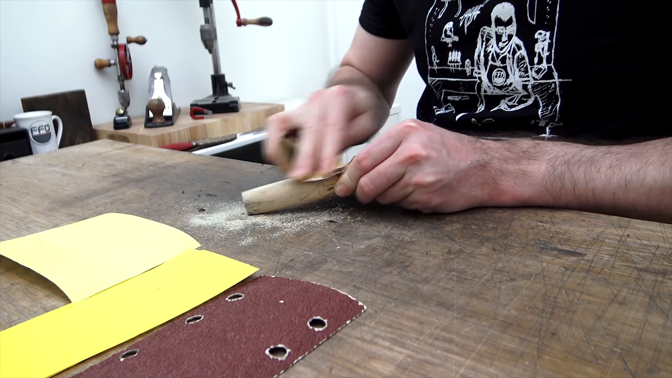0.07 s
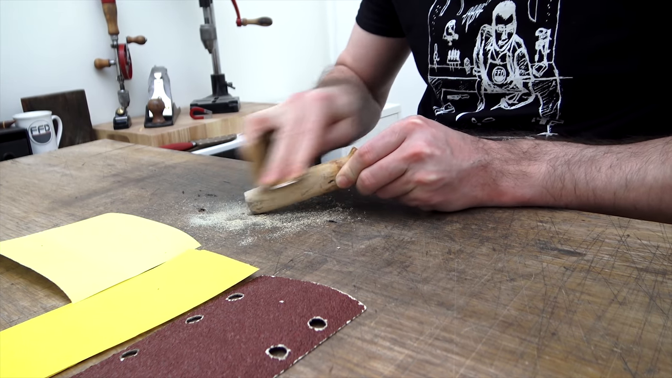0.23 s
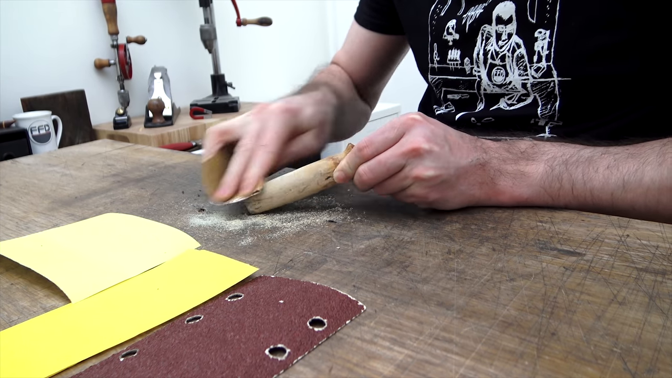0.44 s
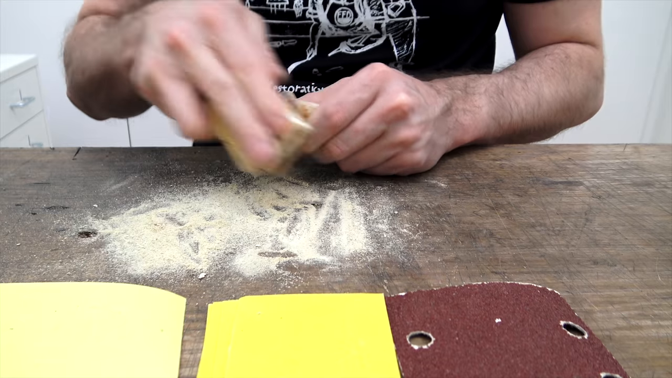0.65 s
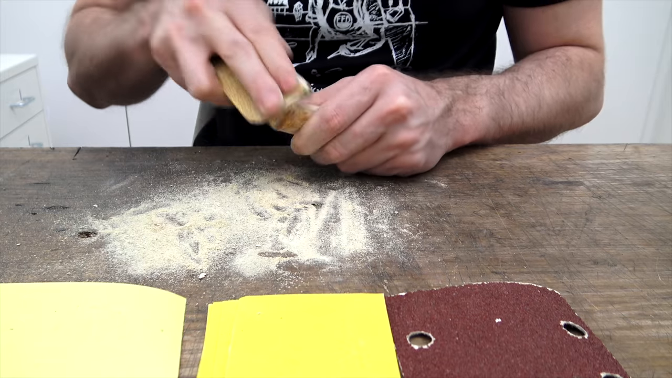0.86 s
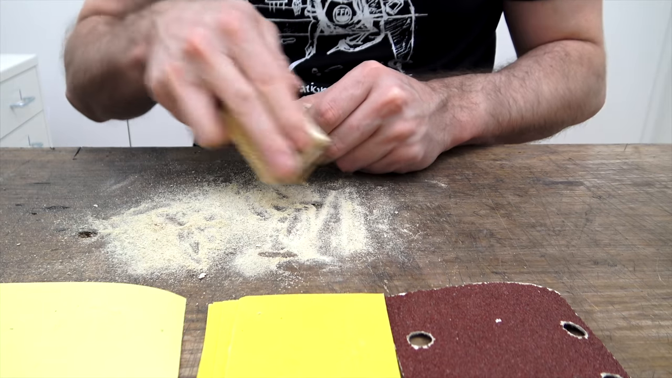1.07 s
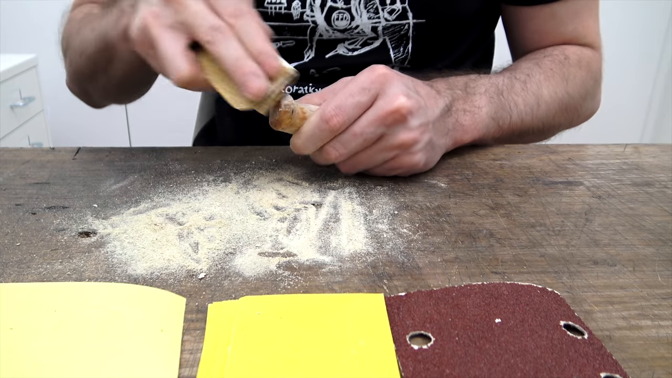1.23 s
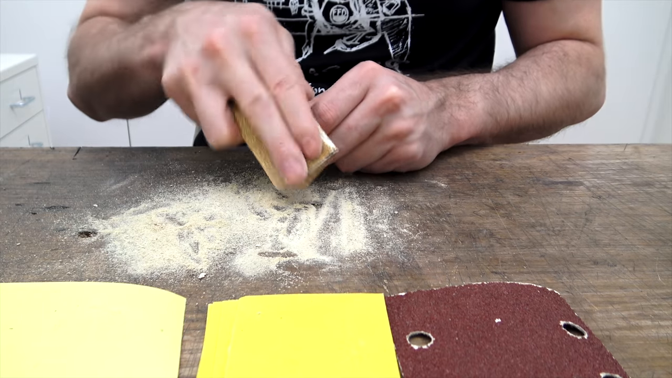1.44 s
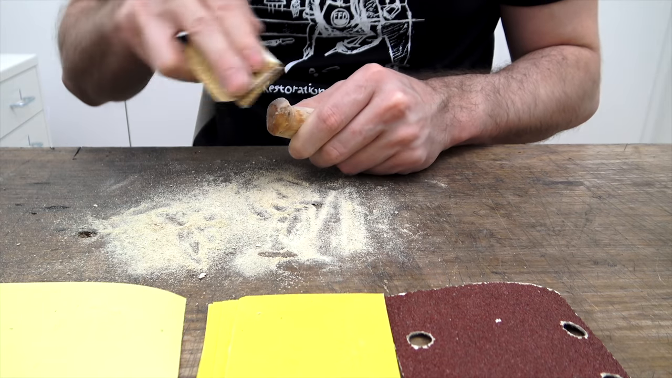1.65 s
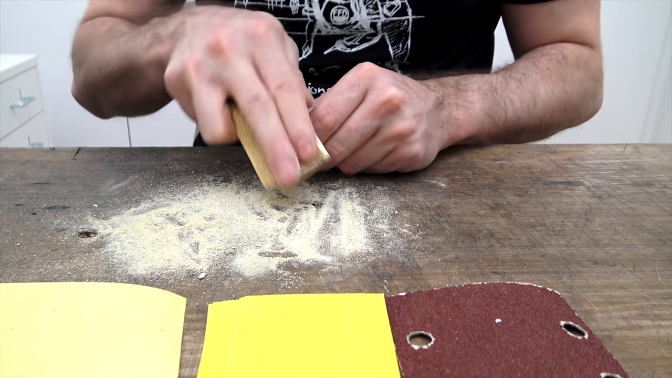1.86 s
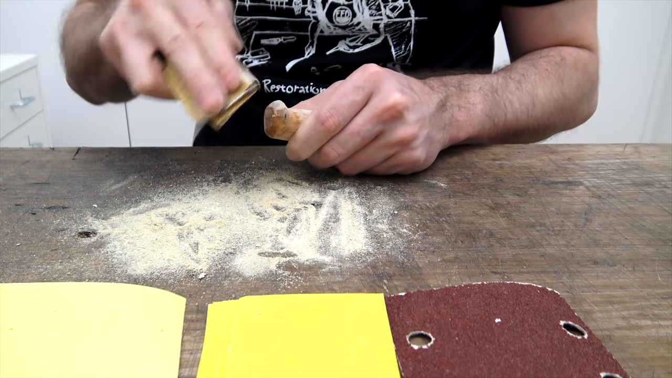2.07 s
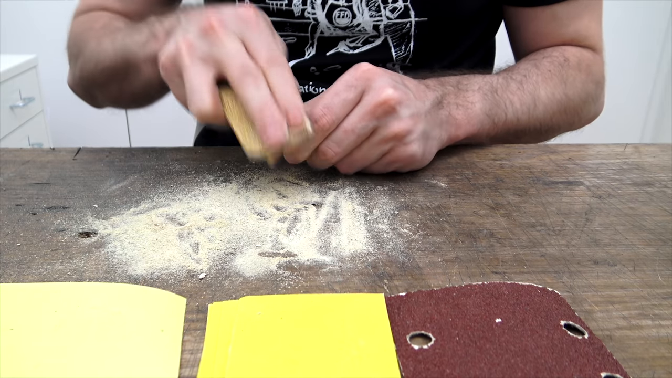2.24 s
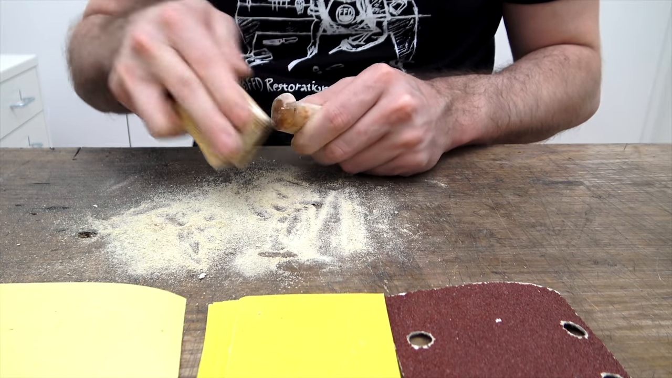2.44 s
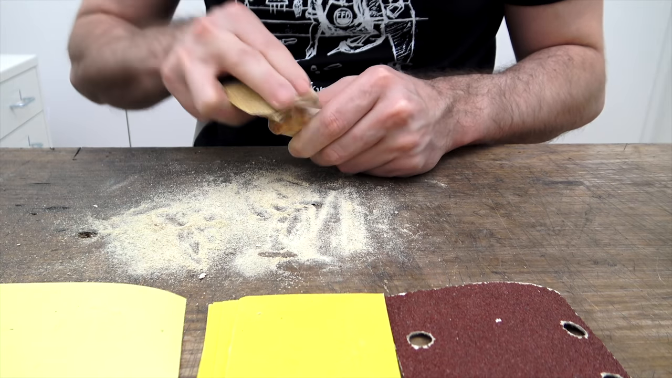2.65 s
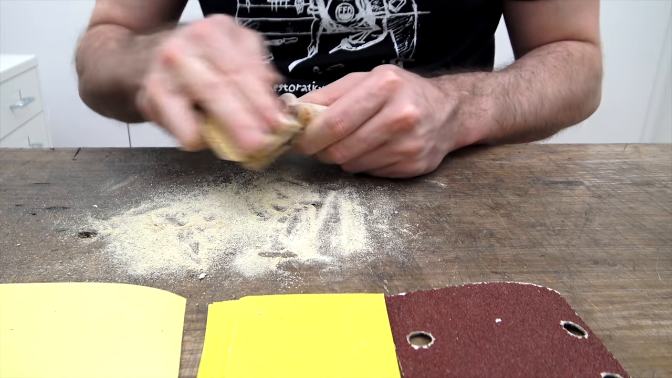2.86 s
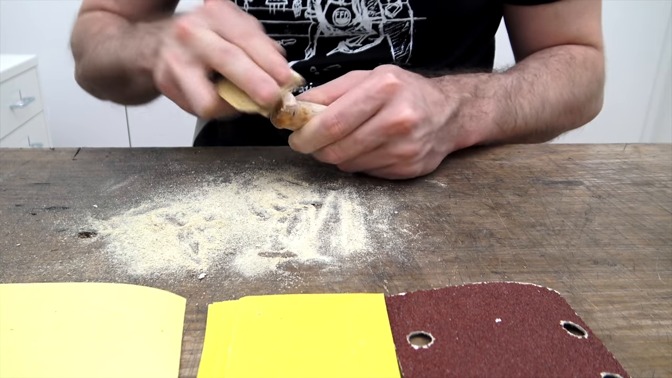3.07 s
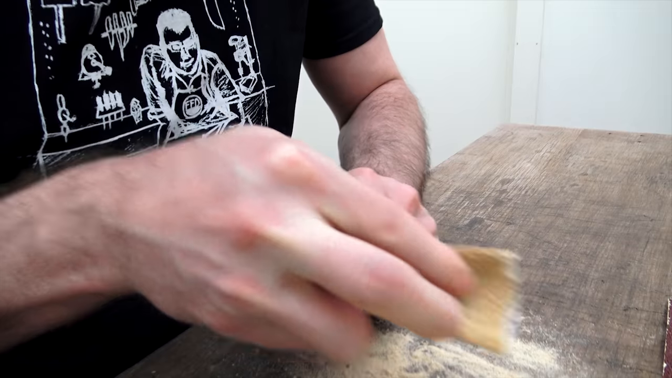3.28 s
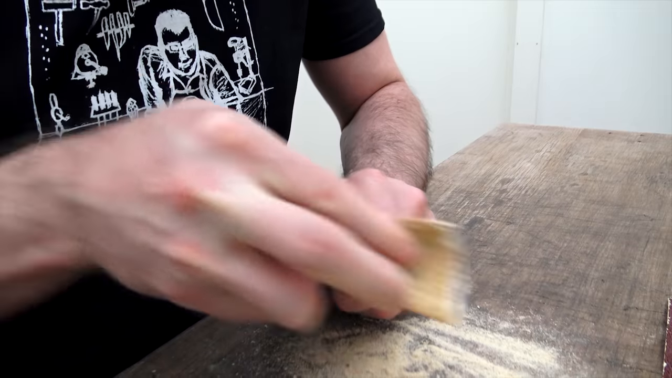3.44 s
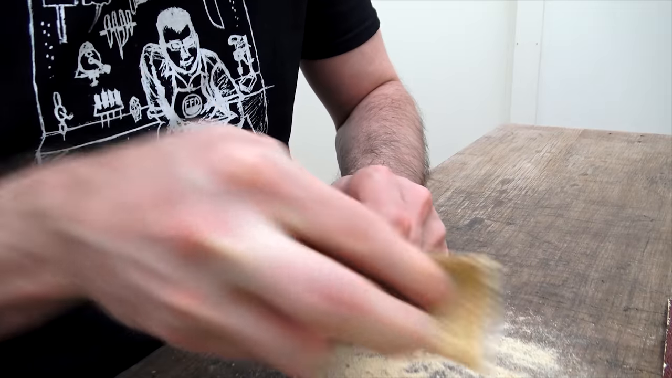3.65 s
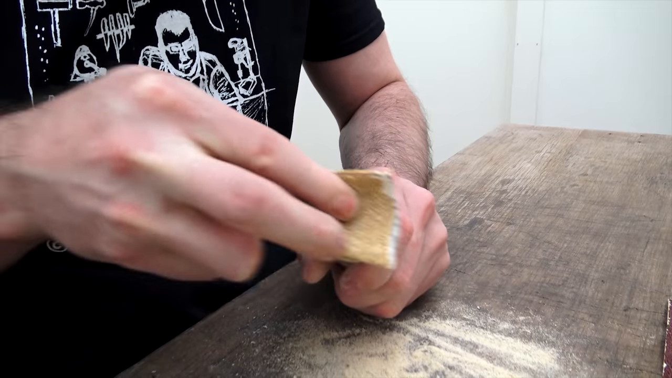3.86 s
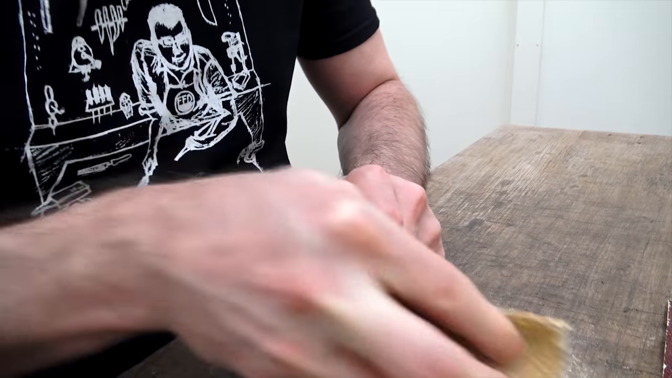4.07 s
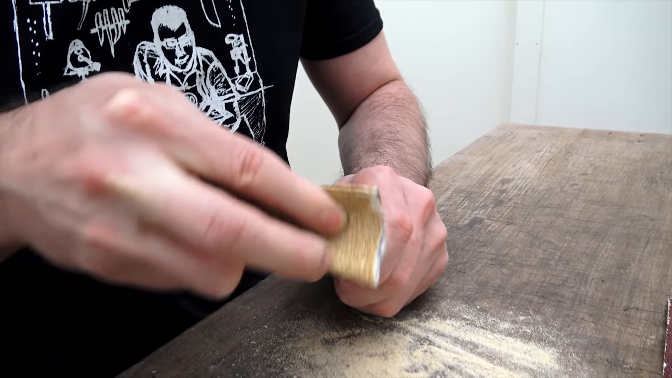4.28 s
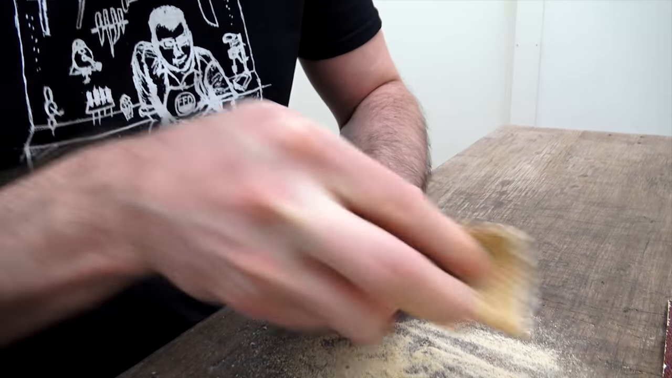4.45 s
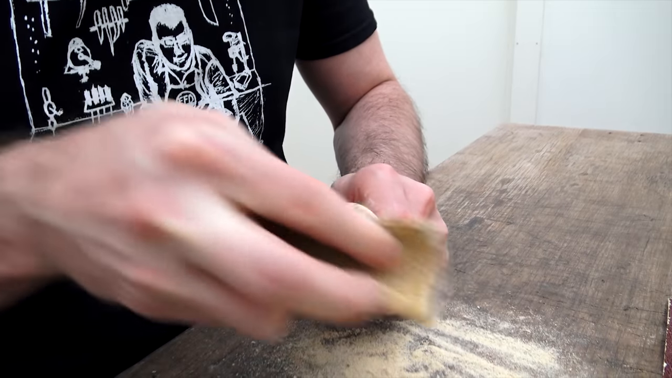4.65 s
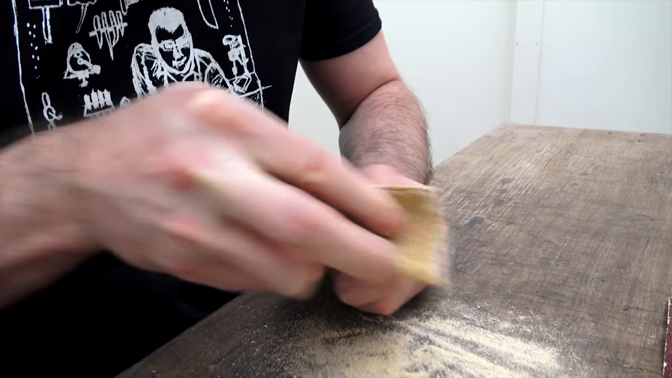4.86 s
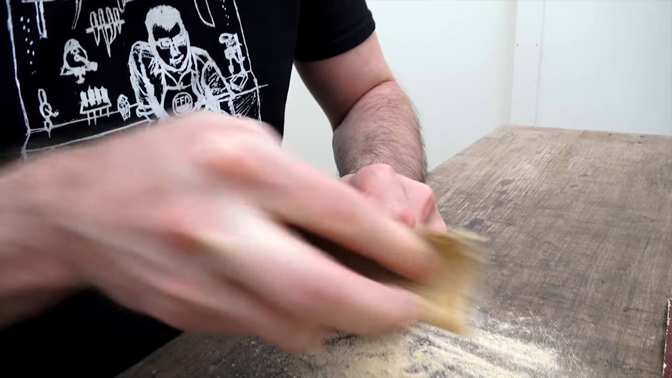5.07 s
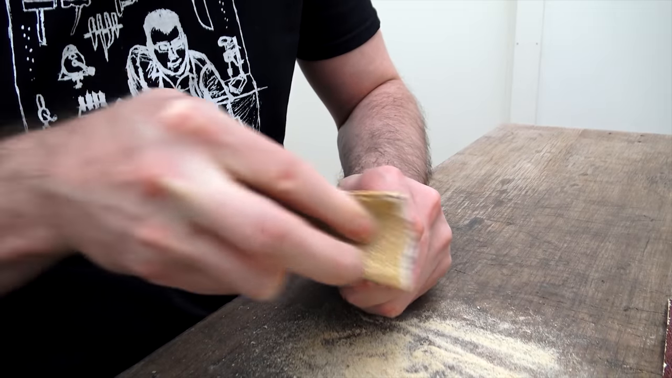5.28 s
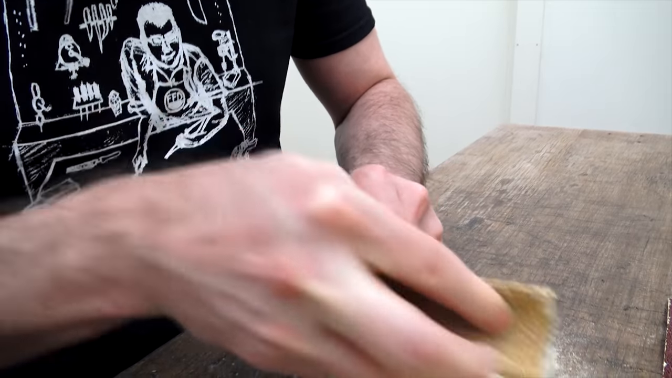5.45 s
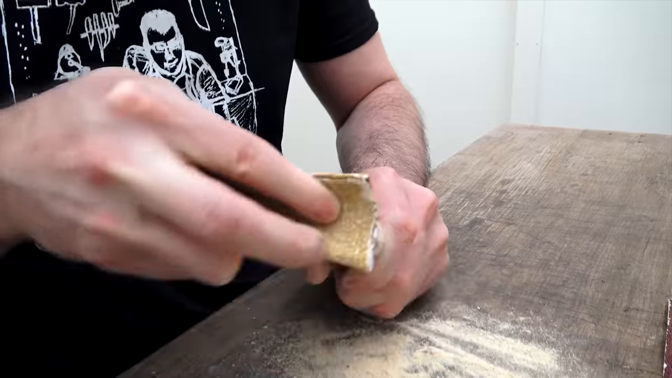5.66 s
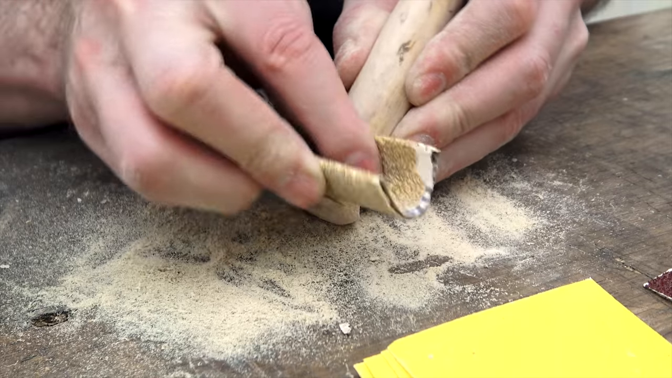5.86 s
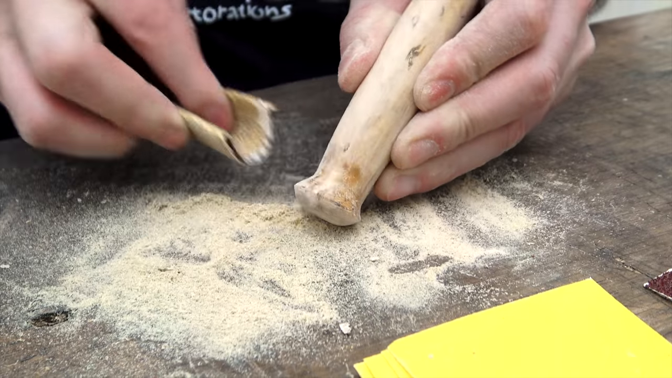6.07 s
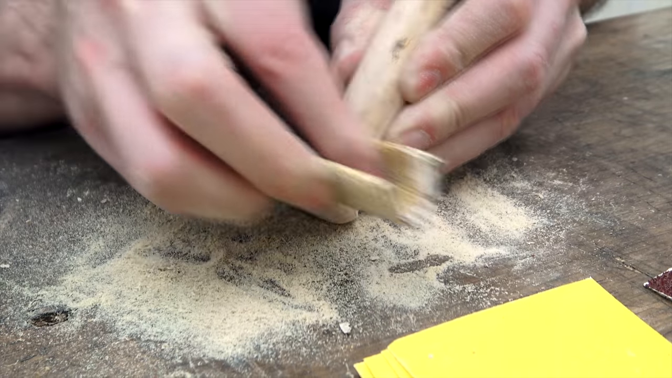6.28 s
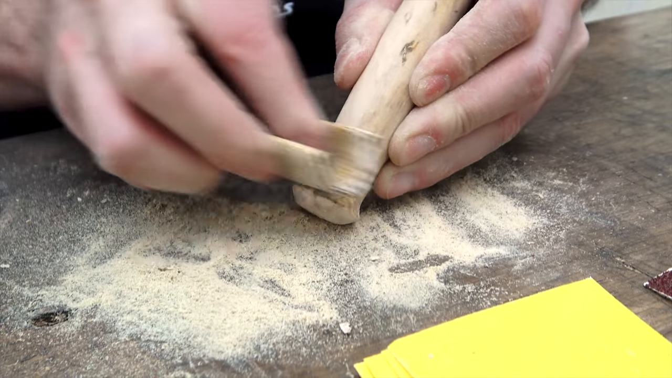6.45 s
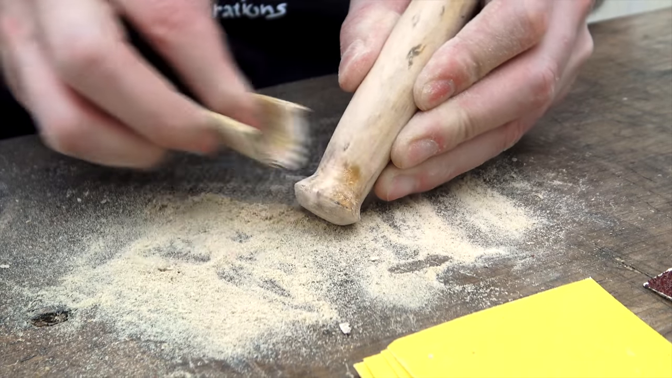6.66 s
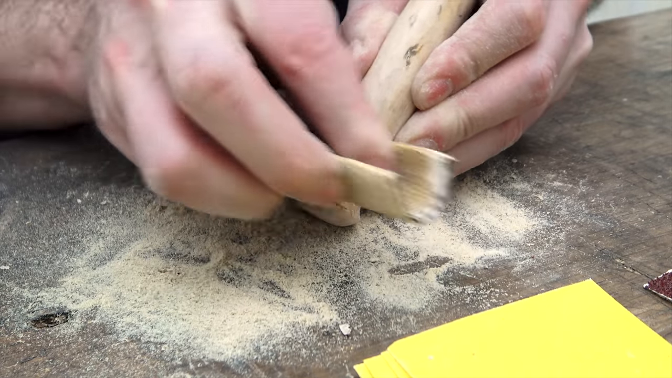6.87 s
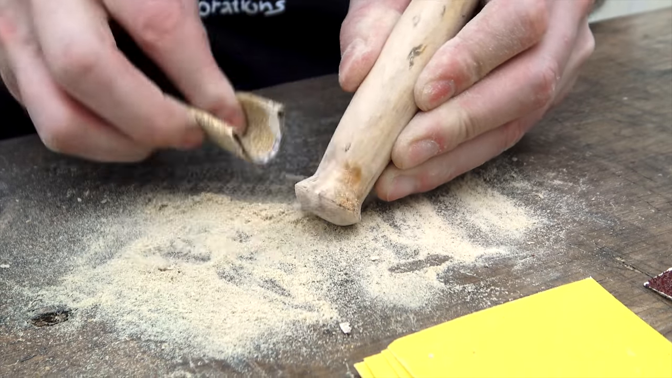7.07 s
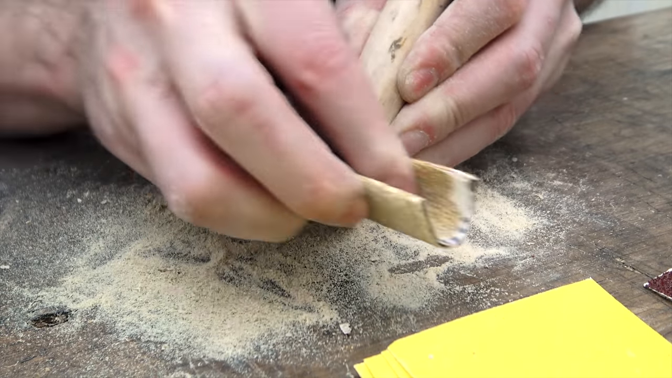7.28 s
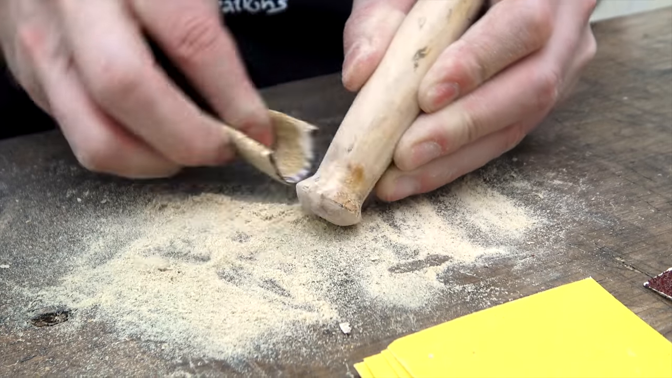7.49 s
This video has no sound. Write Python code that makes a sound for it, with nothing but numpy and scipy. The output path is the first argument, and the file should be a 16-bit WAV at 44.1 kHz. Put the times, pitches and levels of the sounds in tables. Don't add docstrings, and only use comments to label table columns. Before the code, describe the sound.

Close, dry, gritty sanding strokes on wood, changing tone with each new grip, with small ticks, snaps and soft bench thumps in a lively room.

```python
import sys
import numpy as np
from scipy import signal
from scipy.fft import rfft, irfft, next_fast_len
from scipy.io import wavfile
from scipy.ndimage import map_coordinates

SR = 44100
rng = np.random.default_rng(int(sys.argv[2]) if len(sys.argv) > 2 else 0)


def undo_db(level):
    steps = np.asarray(level, float) / 20
    return 10 ** steps


def put_to_file(sound):
    columns = np.atleast_2d(sound).T
    safe = np.clip(columns, -1, 1)
    whole_steps = np.round(safe * 32767)
    wavfile.write(sys.argv[1], SR, whole_steps.astype(np.int16))


N = 331632


def unit(x):
    return x / np.sqrt(np.mean(x ** 2) + 1e-20)


def along(points, hz):
    f, v = np.transpose(points)
    return np.interp(np.log(hz + 1), np.log(f + 1), v)


def wobble(rate):
    return map_coordinates(rng.standard_normal(4096), [np.arange(N) * rate / SR], order=1)


def filtered(x, response):
    size = next_fast_len(N + 8192)
    return irfft(rfft(x, size) * response(np.fft.rfftfreq(size, 1 / SR)), size)[..., :N]


def modes(rows, hz):
    total = 0
    for k, (centre, width, db) in enumerate(rows):
        damping = 1j * hz * width
        total = total + (-1) ** k * undo_db(db) * damping / (centre ** 2 - hz ** 2 + damping)
    return total


CUT_S = 0.6

# start in seconds, length in seconds, drag level in dB,
# place along the handle from 0 to 1, weight on the bench in dB.
CONTACTS = [(0, .63, -40, .4, -8), (.892, .228, -47, .55, 0), (1.332, .228, -47, .7, 1),
            (1.7828, .187, -41, .6, 2), (2.211, .25, -45, .4, 1), (2.676, .244, -45, .3, -6),
            (3.1144, .545, -50, .6, 0), (3.9597, .21, -55, .95, -4), (4.4108, .22, -50, .45, 3),
            (4.8685, .2, -46, .6, 1), (5.3186, .22, -51, .35, -3), (5.7663, .334, -48, .6, -3),
            (6.2764, .305, -44, .4, 0), (6.769, .312, -44, .6, 2), (7.2385, .305, -45, .4, 1)]


def sanding():
    size, lead = 2 ** 16, 512
    out = np.zeros((2, N + size))
    rasp, near, far, fizz, bench = pressure()
    crack, knock, snap = taps()
    judder = wobble(30) + wobble(110) + wobble(350)
    catches = grit(spread_db=2.5, judder_db=1.25 * judder)
    fine = grit(spread_db=4.0, judder_db=1.8 * judder)
    drives = np.array([
        rasp * catches + crack,
        near * catches + 0.7 * knock,
        far * catches[::-1] + 0.47 * knock,
        fizz * fine + snap,
        bench * catches + 0.29 * knock])

    starts = [round(s * SR) - lead for s, *_ in CONTACTS[1:]] + [N]
    opening = drives[:, :starts[0]]
    before_cut = np.arange(size) < CUT_S * SR
    out[:, :size] = np.where(before_cut, heard(opening, 0, size), undo_db(1.0) * heard(opening, 1, size))
    for start, end in zip(starts, starts[1:]):
        grip = grip_at((start + lead) / SR)
        out[:, start:start + size] += heard(drives[:, start:end], grip, size)
    return out[:, :N]


# fastest moment in seconds, rise in seconds per 10 dB,
# fall in seconds per 10 dB, rasp level in dB, press of the hand in dB.
RUBBING = [
    (.066, .055, .065, -28.5, 0),
    (.18, .045, .08, -28, 1),
    (.33, .06, .055, -32.5, 1),
    (.44, .035, .085, -29.5, 2),
    (.575, .045, .065, -29.5, 2),
]
END_GRAIN = [
    (.971, 0.046, .08, -31.5, 1),
    (1.055, 0.035, 0.066, -33, -0.88),
    (1.419, .05, 0.065, -32, 0.96),
    (1.49, 0.022, 0.085, -32, -0.77),
    (1.878, 0.033, 0.099, -29, -1.2),
    (2.32, 0.042, 0.071, -30, -0.54),
    (2.44, 0.034, 0.041, -40, 1),
    (2.768, .06, .08, -31.5, -1),
    (2.884, 0.027, 0.026, -32, 1),
]
RIM = [(3.14, 0.021, 0.066, -44, 3.5), (3.223, .07, 0.039, -28, -4), (3.31, .01, 0.07, -36, 3.5),
       (3.398, 0.035, 0.048, -27, -1), (3.53, .015, .08, -31, -15.5), (3.613, 0.07, 0.038, -26.5, 3),
       (4.003, 0.0055, .05, -32, 0), (4.022, 0.015, 0.11, -27.5, -5), (4.075, .06, .06, -27, 2),
       (4.13, .045, .045, -32, 9), (4.456, 0.0059, .05, -37.5, 1), (4.48, 0.017, 0.12, -26, -2),
       (4.59, 0.1, 0.023, -30, 2.5), (4.912, .007, 0.17, -28, -4.5), (5.028, 0.062, 0.055, -29.5, 5),
       (5.362, .008, 0.12, -32, -2), (5.47, 0.07, 0.094, -27, 3)]
KNOB = [(5.856, 0.062, 0.06, -32, 2.2), (5.976, .006, 0.065, -37, 2), (6.035, 0.047, 0.057, -29, -0.7),
        (6.295, .015, 0.094, -36.5, -0.25), (6.366, 0.088, 0.036, -31, 0.65),
        (6.525, 0.1, 0.076, -31.5, 0.46), (6.79, 0.054, 0.044, -34, 0.61),
        (6.83, 0.058, 0.07, -32.5, -0.48), (6.975, 0.042, 0.071, -32.5, 1.2),
        (7.03, 0.055, 0.042, -30, -1.1), (7.265, 0.032, 0.073, -33, -1.6), (7.34, 0.073, 0.042, -34.5, 2.8),
        (7.465, 0.048, .2, -29.5, -0.62)]
# handle, fizz and bench re rasp in dB, travel along the handle per second.
GRIPS = [
    (-4.5, -2, -21.5, 0.16),
    (-5.5, -5.5, -14.5, 0),
    (-7, -5, -29, -0.65),
    (-6, -4.5, -28, 2.5),
    (-2.5, -2.5, -16, 0.4),
]
# handle, fizz and bench re rasp in dB.
DRAG_DB = (3, -1, 6.5)
# handle, fizz and bench in dB per dB of press.
PRESS = (1.02, -0.45, 0.24)
LINGER = (0.98, .8, 1.16)
SWEEP_POWER = 1.52
CLOG_DB = 1.5
LIFT_S = 0.065


def pressure():
    gains = np.zeros((5, N))
    press = np.array([0, *PRESS])[:, None]
    linger = np.array([1, *LINGER])[:, None]
    for start, length, drag_db, place, weight_db in CONTACTS:
        *share_db, travel = GRIPS[grip_at(start)]
        on = slice(round(start * SR), min(round((start + length + LIFT_S) * SR), N))
        t = np.arange(on.start, on.stop) / SR - start
        power = 2 if start < CUT_S else SWEEP_POWER
        level = undo_db(drag_db + np.array([0, *DRAG_DB]))[:, None] + 0 * t
        for at, rise, fall, db, press_db in RUBBING + END_GRAIN + RIM + KNOB:
            if start < at < start + length:
                since = t + start - at
                span = np.where(since < 0, rise, fall * linger)
                sweep_db = db + press_db * press - 10 * abs(since / span) ** power
                level = np.hypot(level, undo_db(sweep_db))
        touch = np.clip(np.minimum(t / 0.00033, (length - t) / LIFT_S + 1), 0, 1)
        rasp, handle, fizz, bench = touch * level * undo_db(np.array([0, *share_db]) - 2.0)[:, None]
        far = np.clip(place + travel * (t - length / 2), 0, 1)
        clogged = fizz * undo_db(-CLOG_DB * (t / length) ** 2)
        gains[:, on] = rasp, handle * np.sqrt(1 - far), handle * np.sqrt(far), clogged, bench * undo_db(weight_db)
    return gains


def grit(spread_db, judder_db):
    coarseness = np.minimum(rng.exponential(size=N), 4.5)
    return unit(rng.standard_normal(N) * undo_db(spread_db * coarseness) * undo_db(judder_db))


# peak in dB, knock re peak in dB.
LANDINGS = [(-60, -4), (-44, -1), (-33, -13), (-34, -13), (-39, -1), (-38, -1), (-51, -4), (-22, -4.5),
            (-23, -8), (-24, -5.5), (-28, -4.5), (-42, -1), (-34, -1), (-39, -7), (-33, -4)]
# start in seconds, peak in dB, knock re peak in dB.
SNAPS = [(0.6215, -17.5, -11), (1.351, -28, -21), (1.8542, -27.5, -12), (1.8735, -21, -16),
         (1.9503, -24, -30), (2.292, -28, -3), (2.425, -30, 0), (3.3048, -26, -8), (3.3706, -18.5, -8),
         (3.5187, -25, -29), (3.5618, -16, -17), (3.6161, -26.5, -3.5), (4.0175, -21, -18),
         (4.4481, -32, -18), (4.4753, -20, -19), (5.395, -19, -21), (5.9707, -29, -6), (6.5632, -17, -19),
         (6.863, -25, -19), (7.0427, -16, -18), (7.333, -20, -11)]
# start in seconds, peak in dB.
TICKS = [(0.412, -24), (0.534, -15), (0.9048, -32), (0.935, -16), (0.9877, -24), (1.031, -18),
         (1.0555, -23), (1.48, -30), (1.7931, -19), (1.874, -16), (2.7337, -24), (2.815, -18),
         (2.8679, -26), (3.1973, -15), (3.3937, -22), (4.4593, -29), (4.9126, -18), (5.8202, -21),
         (5.9264, -29), (6.072, -13), (6.5171, -19), (7.433, -30), (7.4899, -17)]
BOUNCE_S, BOUNCE_DB = 0.005, -9.5
LAND_SNAP_DB, SNAP_DB = -8, -16
TICK_S, TICK_DB, TICK_BODY_DB = 0.00089, -6.5, -21


def taps():
    layers, t = np.zeros((3, N + SR)), np.arange(600) / SR

    def edge(at, width):
        return (t >= at) * np.exp(-((t - at) / width) ** 2)

    after = 0.084 * undo_db(-60 * t / 0.04)
    landing = edge(0, 0.0027) + undo_db(BOUNCE_DB) * edge(BOUNCE_S, 0.0022) + 1.7 * after
    breaking = edge(0, 0.0035) + after
    chip = edge(0, TICK_S)
    rows = []
    for contact, (db, knock_db) in zip(CONTACTS, LANDINGS):
        rows.append((contact[0], db, knock_db, LAND_SNAP_DB, landing))
    for s, db, knock_db in SNAPS:
        rows.append((s, db, knock_db, SNAP_DB, breaking))
    for s, db in TICKS:
        rows.append((s, db + TICK_BODY_DB, -12, TICK_DB - TICK_BODY_DB + 6.0, chip))

    for s, db, knock_db, snap_db, shape in rows:
        burst = rng.standard_normal(len(t)) * shape
        burst *= np.linalg.norm(shape) / np.linalg.norm(burst)
        shares_db = np.array([[-9], [knock_db - 3.5], [snap_db - 5.0]])
        start = round(s * SR)
        layers[:, start:start + len(t)] += undo_db(db + shares_db) * burst
    return layers[:, :N]


# frequency in Hz, width in Hz, level in dB.
HANDLE = [
    [(402, 130, -13), (685, 220, -8), (1520, 270, -0.5), (2050, 280, -2), (2440, 320, -2.5)],
    [(428, 33, -4), (636, 170, -5), (1307, 460, -5), (1993, 157, 6.5), (2254, 206, 0)],
    [(343, 210, -12), (694, 340, -9), (1120, 340, -6.5), (1480, 270, -1.5), (1820, 130, 2.5)],
    [(300, 110, -20.5), (439, 12, -0.5), (570, 400, -8.5), (1090, 750, -5.5), (1450, 300, -1),
     (1767, 114, 2.5)],
    [(542, 146, -5), (734, 124, -4.5), (868, 80, -3), (1052, 74, 1), (1368, 190, -4), (1547, 140, 0),
     (1707, 220, -1.5), (2206, 200, -4)],
]
PAPER = [
    [(3170, 1070, 0.5), (4370, 4500, -0.5), (7700, 5400, -2.5)],
    [(3150, 990, 0), (4850, 1780, 0), (7400, 2970, -4)],
    [(3200, 1400, 0), (4630, 2500, -1), (6500, 2000, -2.5)],
    [(2860, 720, 1.5), (4380, 2430, -0.5), (6550, 3400, -3)],
    [(2730, 1030, -4), (4740, 1960, 0), (6780, 3960, -3.5)],
]
REACH = (0.942, 1.048)
# frequency in Hz, level in dB.
FIZZ = [(5000, -13), (8000, -3), (10000, -1.5), (13000, -4), (15000, -12), (16500, -25)]
# frequency in Hz, width in Hz, level in dB.
BENCH = [(60, 7, -2), (128, 29, -3.5), (212.2, 25, -1.5), (286, 240, -13.5)]
# frequency in Hz, level in dB.
PORTS = [(100, -30), (1500, -28), (3000, -41), (6000, -20), (15000, -19)]


def heard(drives, grip, size):
    hz = np.fft.rfftfreq(size, 1 / SR)
    sign = (-1) ** len(HANDLE[grip])
    bodies = [sign * modes(PAPER[grip], hz)]
    for ratio in REACH:
        end = [(c * (ratio if c > 1200 else 1), width, db) for c, width, db in HANDLE[grip]]
        bodies.append(modes(end, hz))
    bodies += [undo_db(along(FIZZ, hz)), -modes(BENCH, hz)]

    direct = 0
    for drive, body in zip(rfft(drives, size), bodies):
        direct = direct + drive * body / np.sqrt(np.mean(abs(body) ** 2))
    early = 1j * undo_db(along(PORTS, hz))
    return irfft(direct * (room(size) + [hz ** 0, early]), size)


GRIP_FROM = [0, .88, 3.1, 3.9, 5.75, 9]


def grip_at(s):
    return np.searchsorted(GRIP_FROM, s, side="right") - 1


# start in seconds, lowest mode in dB, top board mode in dB.
BUMPS = [(0.592, -38.5, -34.5), (0.959, -47, -43), (1.039, -46, -40.5), (1.398, -41, -53),
         (1.469, -45, -41), (1.839, -45, -39.5), (1.919, -40, -33), (2.278, -44, -47), (2.359, -46, -39),
         (2.759, -55, -41), (3.171, -53, -40), (3.957, -53, -55), (4.141, -49, -73), (4.55, -57, -58),
         (4.949, -54, -50), (5.349, -54, -72), (5.848, -60, -44), (6, -58, -37), (6.318, -59, -57),
         (6.489, -59, -31), (6.8, -57, -48), (6.948, -72, -32), (7.299, -54, -42), (7.45, -55.5, -29)]
# frequency in Hz, time to fall 60 dB in seconds.
BENCH_RING = [(41.7, 0.48), (123.4, 0.21), (64.7, 0.29)]
THIRD_DB = -6.5


def bumps():
    out, t = np.zeros(N + SR), np.arange(SR * 3 // 4) / SR
    for s, low_db, board_db in BUMPS:
        start = round(s * SR)
        levels_db = (low_db, board_db, (low_db + board_db) / 2 + THIRD_DB)
        for (hz, t60), level_db, rise_s in zip(BENCH_RING, levels_db, (0.013, 0.012, 0.012)):
            swell = (1 - np.exp(-t / rise_s)) ** 2
            out[start:start + len(t)] += undo_db(level_db + 6.0 - 60 * t / t60) * swell * np.sin(2 * np.pi * hz * t)
    return out[:N]


# frequency in Hz, time to fall 60 dB in seconds.
ROOM = [(100, 0.33), (450, 0.4), (1800, 0.51), (4000, 0.52), (8000, 0.5), (15000, 0.34)]
# frequency in Hz, level in dB.
WET = [(100, -7), (1000, -3), (4000, -2.5), (14000, -10)]
# frequency in Hz, level in dB.
WIDTH = [(100, -27), (300, -13), (1000, -28), (2500, -22), (4000, -30), (5500, -14.5), (8000, -10),
         (12000, -12), (15000, -8)]


def room(size):
    hz, t, z = signal.stft(rng.standard_normal((2, SR * 3 // 4)), SR, nperseg=256)
    t60 = along(ROOM, hz)[:, None]
    tail = signal.istft(z * undo_db(-60 * t / t60) / np.sqrt(t60), SR, nperseg=256)[1]
    tail = tail / np.linalg.norm(tail[0])
    delayed = np.pad(tail, ((0, 0), (250, 0)))
    hz = np.fft.rfftfreq(size, 1 / SR)
    return rfft(delayed, size) * undo_db(along(WET, hz) + [0 * hz, along(WIDTH, hz)])


# frequency in Hz, level in dB per Hz.
HUSH = [(25, 8), (60, -21), (200, 0), (450, -8.5), (1000, -3), (4000, -28), (10000, -20), (16000, -29)]


def hush():
    return undo_db(-65) * unit(filtered(rng.standard_normal(N), lambda hz: undo_db(along(HUSH, hz))))


# frequency in Hz, left minus right in dB.
LEAN = [(60, 1.5), (110, 3.5), (200, 3), (380, 0.5), (700, 1), (1290, 1.0), (2380, 1), (4400, -0.5),
        (8120, 0.5), (15000, -0.5)]


def scene():
    mid, side = sanding()
    mid = mid + bumps() + hush()
    ports = filtered(mid, lambda hz: undo_db(np.outer([0.5, -0.5], along(LEAN, hz))))
    return ports + [side, -side]


def roll_off(x):
    return signal.sosfilt(signal.butter(12, 16830, fs=SR, output="sos"), x)


# frequency in Hz, level in dB.
TOP = [(15700, 0.5), (16100, -28), (16600, -45)]


def record(dry):
    mix = filtered(dry, lambda hz: undo_db(along(TOP, hz)))
    return roll_off(mix)


dry = scene()
out = record(dry)
put_to_file(out)
```